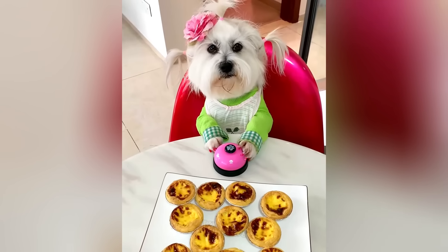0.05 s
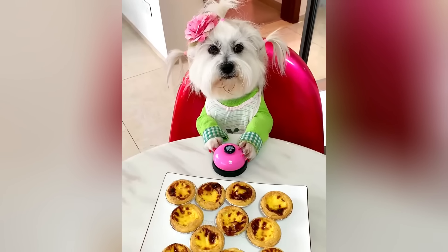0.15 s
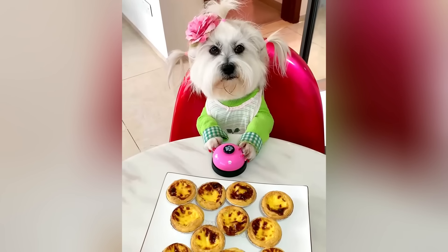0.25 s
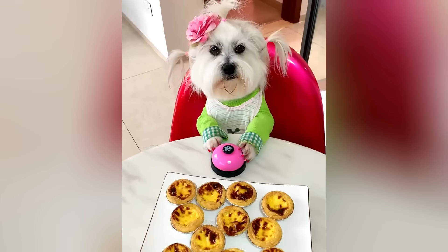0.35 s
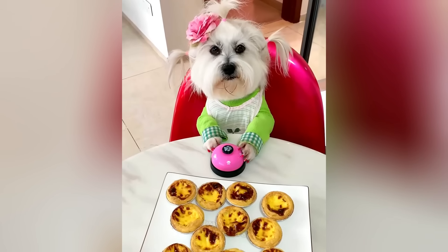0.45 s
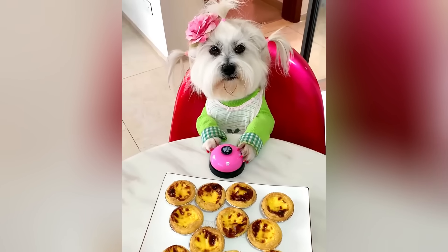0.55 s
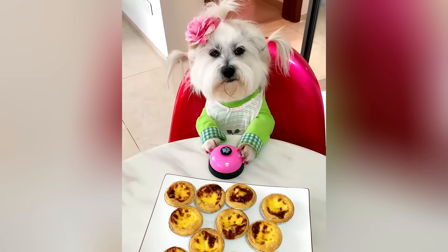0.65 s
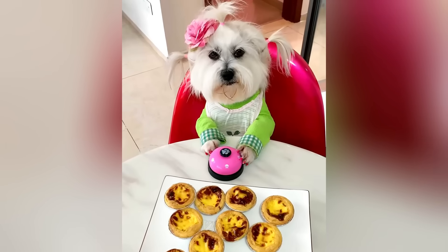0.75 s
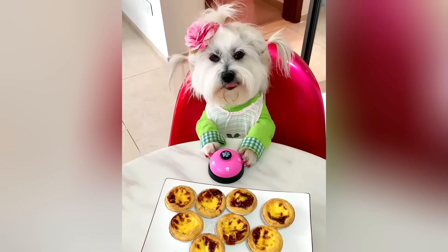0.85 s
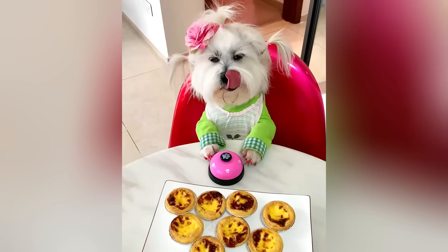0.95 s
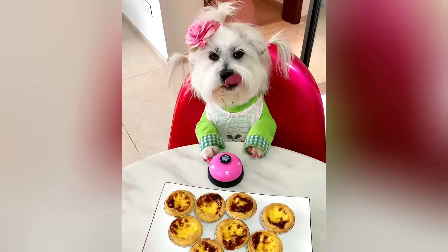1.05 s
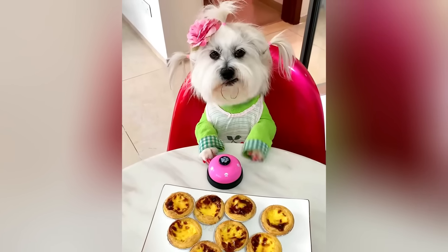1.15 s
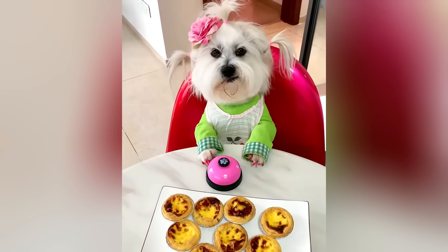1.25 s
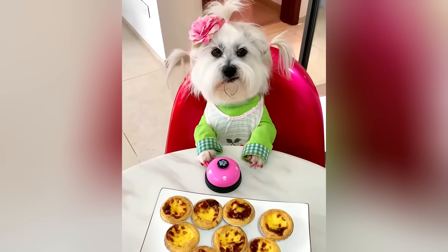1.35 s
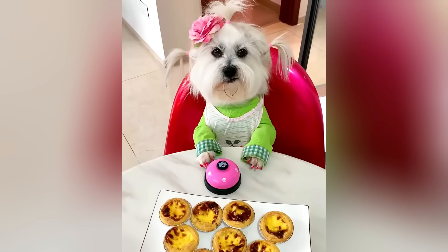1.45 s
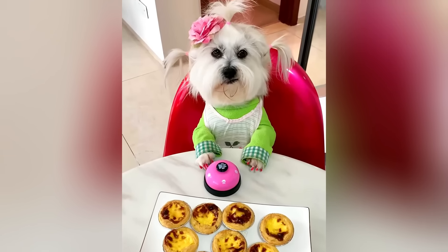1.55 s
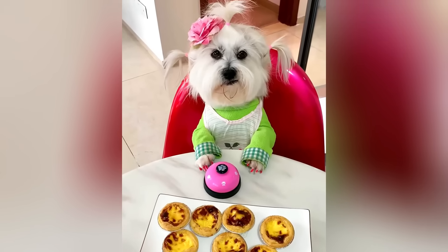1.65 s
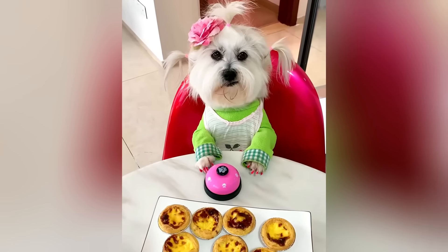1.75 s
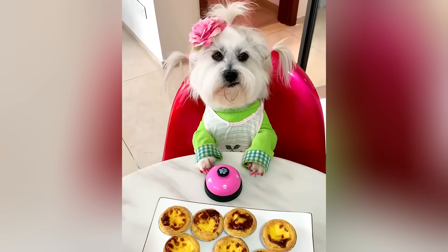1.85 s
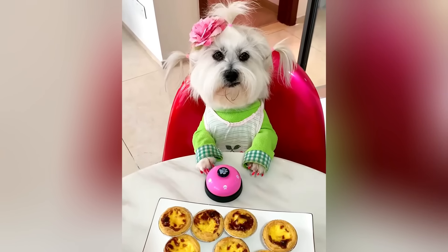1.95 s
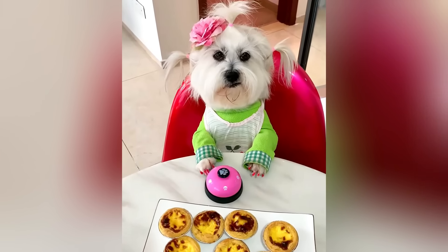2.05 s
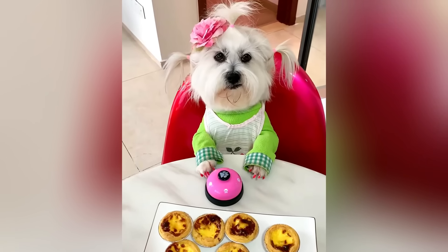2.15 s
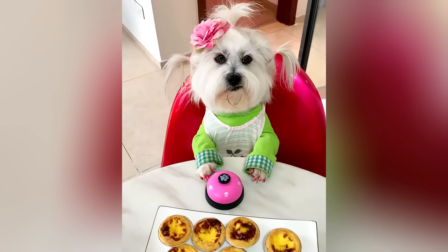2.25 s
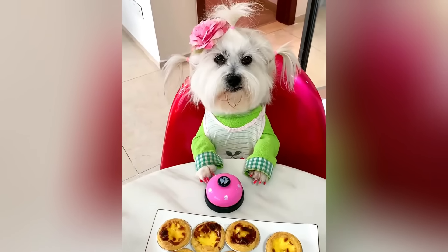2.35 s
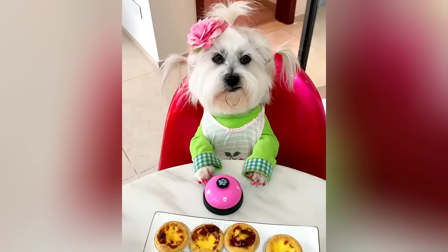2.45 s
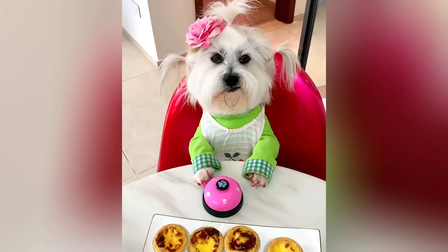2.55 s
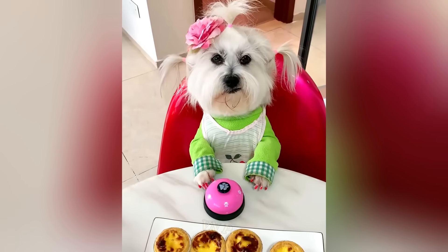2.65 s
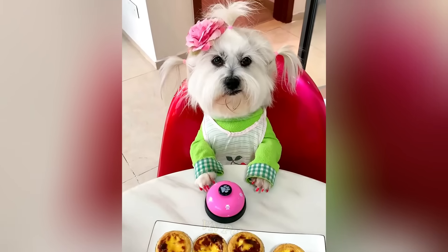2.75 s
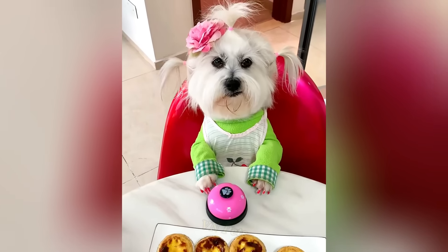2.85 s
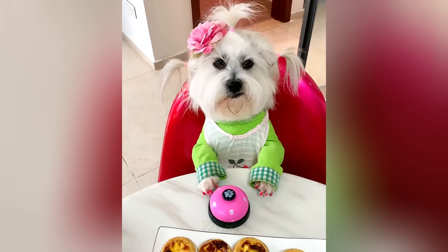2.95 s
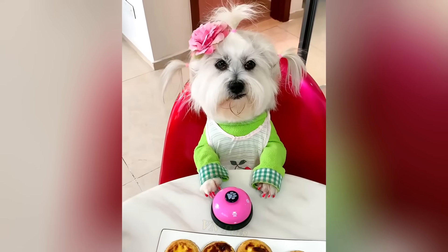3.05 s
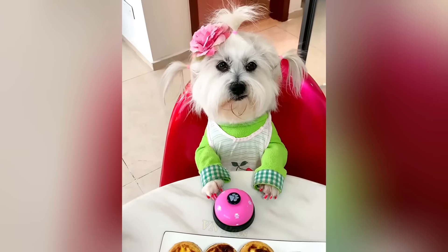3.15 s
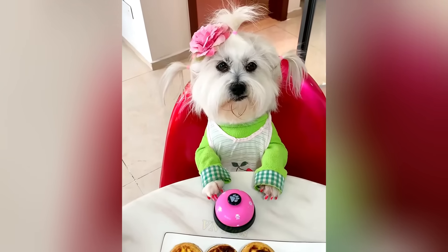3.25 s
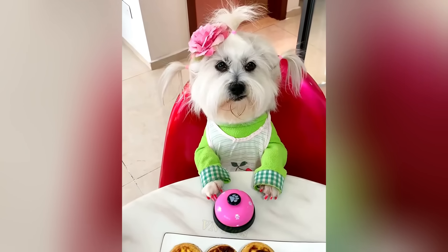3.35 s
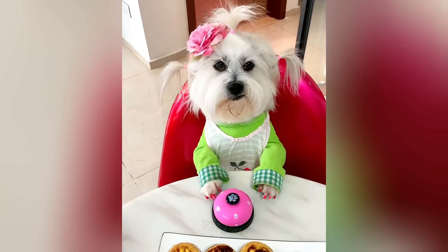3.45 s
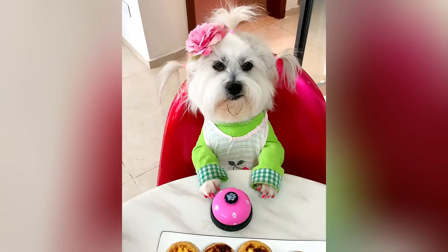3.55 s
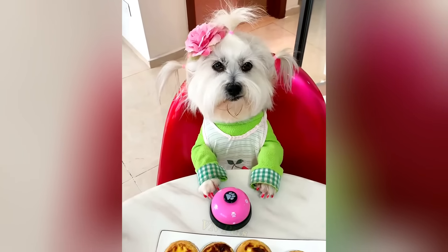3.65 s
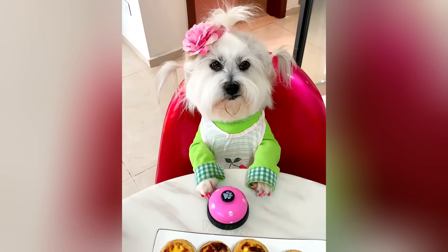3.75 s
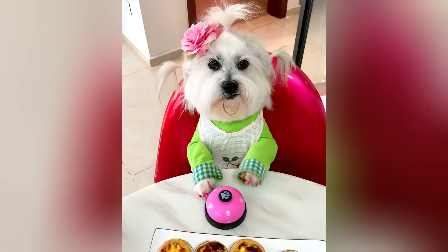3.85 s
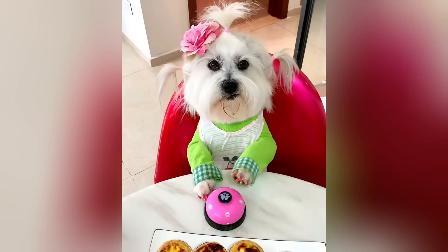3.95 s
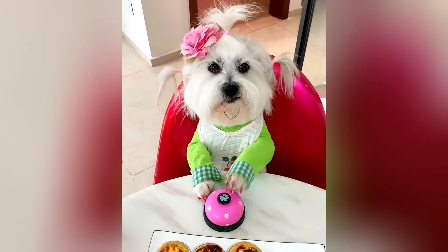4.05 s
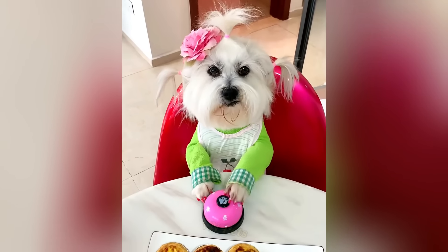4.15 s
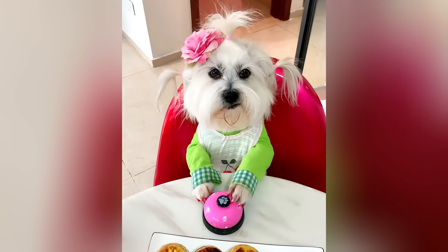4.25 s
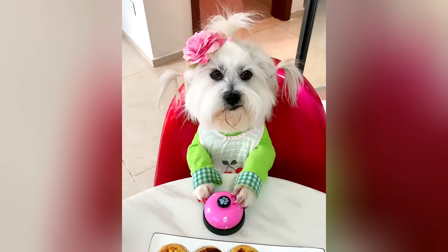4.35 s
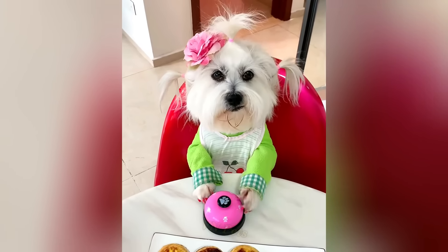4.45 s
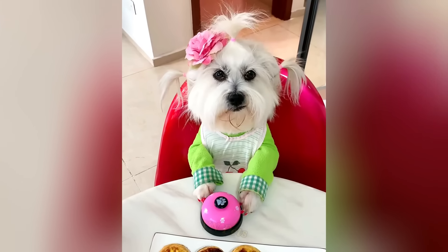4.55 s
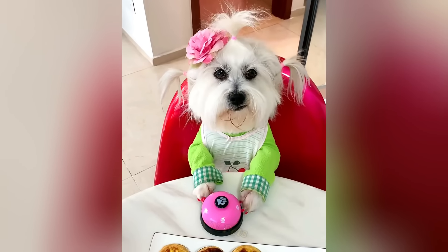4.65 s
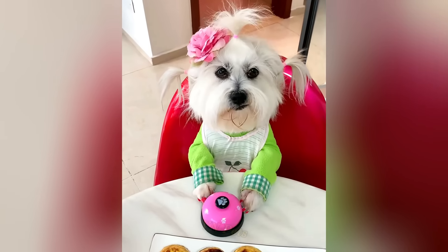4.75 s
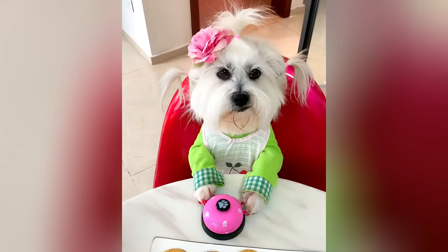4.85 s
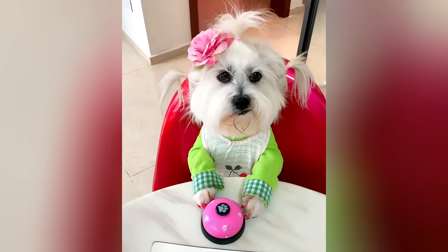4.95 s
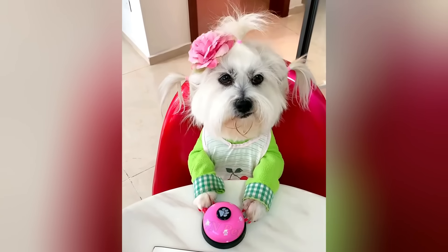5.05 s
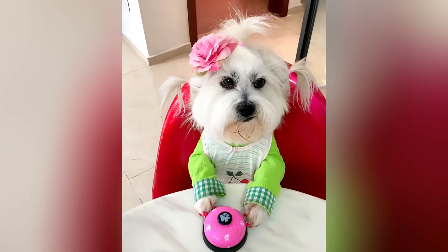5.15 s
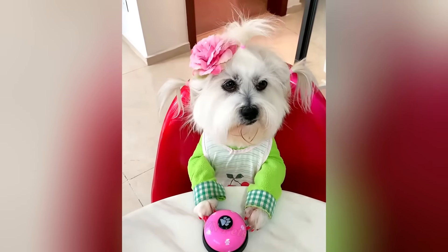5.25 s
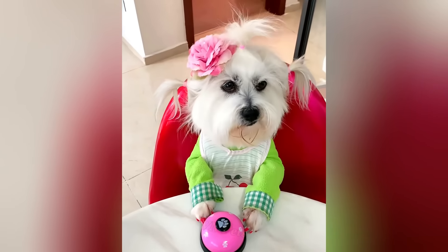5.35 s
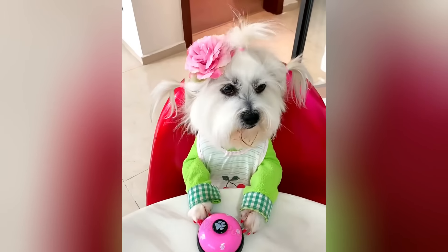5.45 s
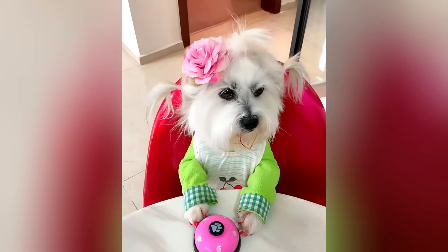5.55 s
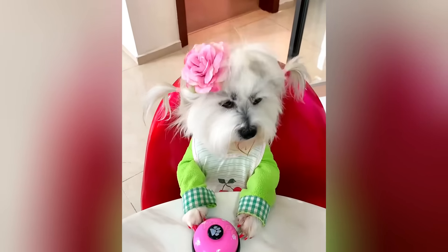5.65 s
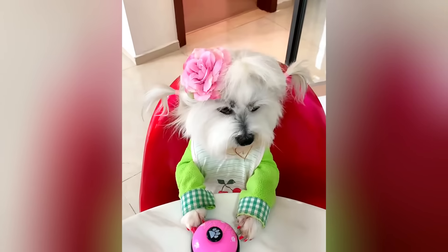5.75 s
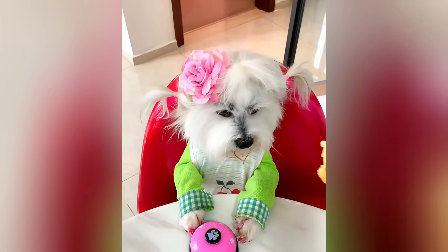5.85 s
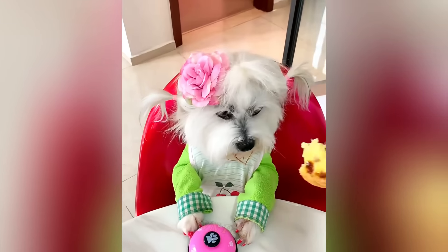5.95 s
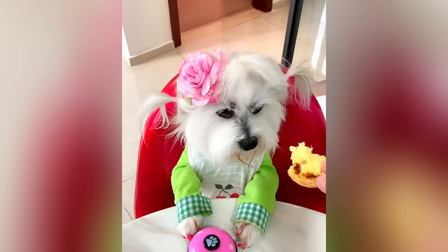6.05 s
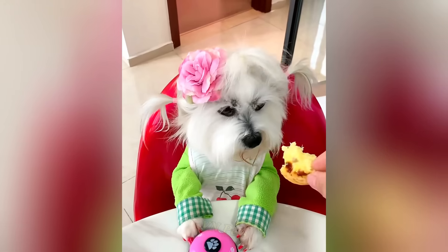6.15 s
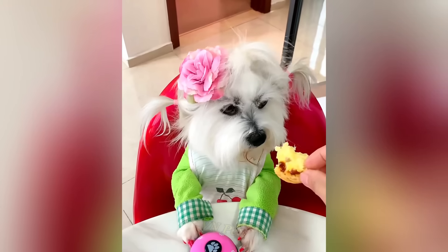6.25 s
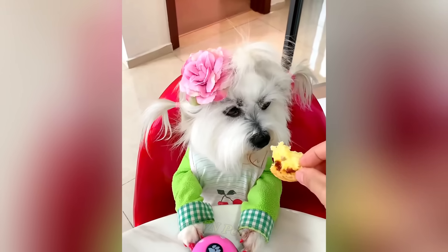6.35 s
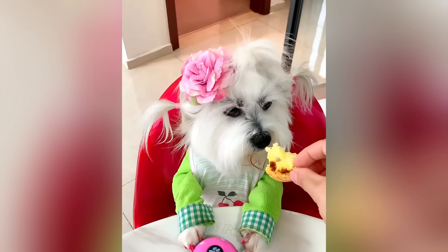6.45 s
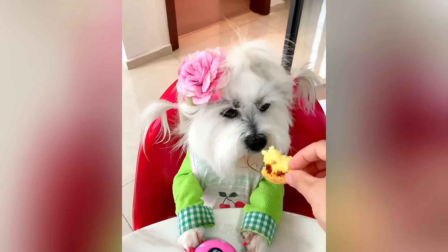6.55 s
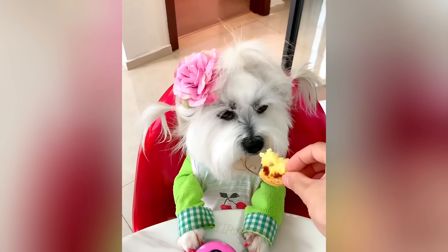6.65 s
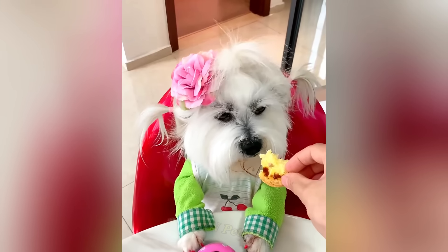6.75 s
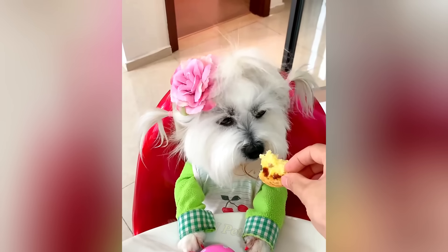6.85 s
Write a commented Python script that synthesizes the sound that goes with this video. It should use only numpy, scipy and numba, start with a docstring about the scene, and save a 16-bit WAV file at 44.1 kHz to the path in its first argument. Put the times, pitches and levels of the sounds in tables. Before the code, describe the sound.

Close stereo pickup in a quiet, hard-surfaced room. A desk bell's high metallic ring is fading from an earlier strike, with a faint click as its button returns. After a long decay, a paw presses again: short scrape, plastic clack, soft thump on stone and steel tick merge into a sharp ding. The ring pulses, dims and lingers to the end, with another faint release click.

```python
"""A push-button service bell on a stone table in a quiet room; the first ding is already ringing.
The button of that press clicks back, then a dog presses again: plunger rattle, thump, clapper on steel.
Modes are decaying sines, split pairs beat; the moving parts are filtered impulses and noise bursts.
The phone's limiter ducks on the blow and lets the ring swell back."""
import sys
import numpy as np
from scipy import signal
from scipy.fft import rfft, irfft, next_fast_len
from scipy.io import wavfile
from numba import njit

SR = 44100
rng = np.random.default_rng(int(sys.argv[2]) if len(sys.argv) > 2 else 0)


def dump_mix(stems):
    """Bounce the given channels to the path in sys.argv[1] as a 16-bit WAV at rate SR."""
    frames = np.atleast_2d(stems).T  # one column per channel
    limited = np.clip(frames, -1, 1)  # hard clip at full scale
    pcm = np.round(limited * 32767).astype(np.int16)
    wavfile.write(sys.argv[1], SR, pcm)


N = 305026

# clapper meets dome: (time [s], strength [dB])
STRIKES = [(-.392, -.2), (4.2776, .2)]
# single modes of the dome: (frequency [Hz], level [dB], t60 [s])
DOME_MODES = [(1260.8, -40.7, 8.4), (1305.2, -28.5, 5.9), (9115, -8, .61), (12920, -6.5, .31)]
# faint partials, mostly sums and differences of the modes: (frequency [Hz], level [dB], t60 [s])
FAINT_PARTIALS = [(1965, -81, 5), (2521.6, -59, 4.2), (2610.4, -67, 2.6), (4531.5, -65, 2.4),
                  (4575.6, -69, 2.1), (7157, -61, 1.3), (7695, -76, 3), (12088, -80, 5)]
# modes split by the dome's slight unevenness:
# (frequency [Hz], level [dB], t60 [s], beat [Hz], twin level re mode [dB], first lull [s])
SPLIT_MODES = [(3270.4, -24, 4.43, 3.365, -2, .029), (5890.8, -13.6, 1.92, 6.1, -20, .112)]
# plunger resonances: (frequency [Hz], width [Hz], level [dB])
PLUNGER_MODES = [(1630, 310, 3.5), (1972, 74, 10.5), (2330, 310, 1), (5180, 780, -19), (9440, 560, -21.5)]
# steel tick spectrum: (frequency [Hz], relative density [dB per Hz])
TICK_SPECTRUM = [(300, -28), (1500, -10.5), (4000, -4.5), (8000, -1.5), (12000, -4), (14000, 2.5),
                 (15300, 5.5), (16200, -21)]
# button release click spectrum: (frequency [Hz], relative density [dB per Hz])
RELEASE_SPECTRUM = [(300, -13), (900, -7), (2500, -7), (4800, -1), (7000, -7.5), (12000, -13), (14000, -32)]
# table response to a push: (frequency [Hz], gain [dB])
THUMP_RESPONSE = [(30, -3), (100, -1), (480, -2.5), (780, 1), (1050, -7.5), (2000, 6.5), (6000, -14)]
# room noise spectrum: (frequency [Hz], relative density [dB per Hz])
AIR_SPECTRUM = [(20, -0.5), (55, 1.5), (110, -3), (190, -8.5), (300, -15.5), (480, -15.5), (680, -17),
                (1000, -14), (2500, -18), (6000, -21), (12000, -23), (14000, -25.5)]
# left-right likeness of the room noise: (frequency [Hz], correlation [-1..1])
AIR_LIKENESS = [(30, .5), (100, 0.28), (300, 0.71), (8000, 0.61)]
# faint far appliance: (frequency [Hz], level [dB rms])
HUM_TONES = [(118, -99), (177, -93.5), (662, -98.5), (700, -100)]
# decay of the wall reflections: (frequency [Hz], t60 [s])
WALL_DECAY = [(200, 0.16), (2000, 0.057), (8000, 0.36), (15000, 0.099)]
# left microphone over right: (frequency [Hz], phase lead [rad], level [dB])
PORTS = [(1255, .27, 1), (1310, .14, .8), (3270, .08, .35), (5900, .02, .3), (9000, 0, 0)]

# leads run back from the strike, other times forward from it
SCRAPE_LEAD_S, SCRAPE_DB, SCRAPE_T60_S, SCRAPE_RISE_S = .019, -28.5, .11, .0087
RATTLE_LEAD_S, RATTLE_GAP_S = .0148, .00405
RATTLE_DB, RATTLE_LOSS_DB = 6.5, 4.5  # first knock, loss per knock
LEVER_LEAD_S, LEVER_DB = .0032, 13.5  # plunger slaps the clapper's lever
SETTLE_S, SETTLE_DB = .057, -13.5  # button at the bottom
PIN_DB, PIN_T60_S = -29.5, .008  # steel tick within each plastic knock
CONTACT_RISE_S = .0003
PAW_DB, THUMP_DB = -17.5, -1.5  # paw lands; blow
BLOW_DB, BLOW_T60_S = -6.5, .0099
REBOUND_S, REBOUND_LOSS_DB = .0112, 7  # clapper falls back on its stop
HOLD_S, RELEASE_DB, RELEASE_T60_S = .6255, -48.5, .012  # button let go
SLOW_BELOW_HZ = 2500
TOP_HZ = 16900


def amp(db):
    """Decibels to gain."""
    return 10 ** (np.asarray(db) / 20)


def unit(x):
    """Scale to rms 1."""
    return x / np.sqrt(np.mean(x ** 2) + 1e-20)


def along(points, hz):
    """Interpolate (frequency [Hz], value) points on a log frequency axis."""
    point_hz, value = np.transpose(points)
    return np.interp(np.log(hz + 1), np.log(point_hz + 1), value)


def filtered(x, response):
    """Apply a complex frequency response, zero-padded."""
    size = next_fast_len(N + SR // 2)
    spectrum = rfft(x, size) * response(np.fft.rfftfreq(size, 1 / SR))
    return irfft(spectrum, size)[..., :N]


def noise(spectrum):
    """Coloured noise of rms 1."""
    white = rng.standard_normal(N)
    return unit(filtered(white, lambda hz: amp(along(spectrum, hz))))


def since(start_s):
    """Seconds since start, zero before it."""
    return np.maximum(np.arange(N) / SR - start_s, 0)


def sine(hz, t):
    """Sine of zero phase at t = 0."""
    return np.sin(2 * np.pi * hz * t)


def fade(t, t60_s, rise_s):
    """Exponential rise and exponential decay."""
    return (1 - np.exp(-t / rise_s)) * np.exp(-np.log(1000) * t / t60_s)


def knock(t, t60_s, rise_s=CONTACT_RISE_S):
    """Envelope of one contact, silent before t = 0."""
    return fade(np.maximum(t, 0), t60_s, rise_s)


def push(t):
    """One-sample impulse at t = 0."""
    return np.abs(t) < .5 / SR


def dome(start_s, attack_s=.001):
    """One blow excites all the steel modes; the lowest swell in last and split modes beat."""
    t = since(start_s)

    def envelope(hz, t60_s):
        return fade(t, t60_s, attack_s * (1 + (SLOW_BELOW_HZ / hz) ** 4))

    ring = np.zeros(N)
    for hz, db, t60_s in DOME_MODES + FAINT_PARTIALS:
        ring += amp(db) * envelope(hz, t60_s) * sine(hz, t)
    for hz, db, t60_s, beat_hz, twin_db, lull_s in SPLIT_MODES:
        # the twin cancels most at the lull
        twin = amp(twin_db) * np.sin(2 * np.pi * (hz * t - beat_hz * (t - lull_s)))
        ring += amp(db) * envelope(hz, t60_s) * (sine(hz, t) - twin)
    return ring


def air(level_db=-77.5):
    """Room rumble and hiss as mid/side noise of set correlation, plus steady hum tones."""
    def mid_side_gain(hz):
        angle = np.arccos(np.clip(along(AIR_LIKENESS, hz), -1, 1)) / 2
        return np.array([np.cos(angle), np.sin(angle)])

    sources = np.array([noise(AIR_SPECTRUM), noise(AIR_SPECTRUM)])
    mid, side = filtered(sources, mid_side_gain)
    hum = sum(amp(db) * np.sqrt(2) * sine(hz, since(0)) for hz, db in HUM_TONES)
    return amp(level_db) * np.array([mid + side, mid - side]) + hum


def button_release(t, click):
    """The button clicks back when let go: a short noise burst."""
    return amp(RELEASE_DB) * knock(t - HOLD_S, RELEASE_T60_S) * click


def plastic(hz, low_hz=1200):
    """Plunger resonances of alternating sign; so small a part radiates little bass."""
    modes = 0
    for k, (centre_hz, width_hz, db) in enumerate(PLUNGER_MODES):
        damping = 1j * hz * width_hz
        modes = modes + (-1) ** k * amp(db) * damping / (centre_hz ** 2 - hz ** 2 + damping)
    return modes * (hz ** 2 / (hz ** 2 + low_hz ** 2)) ** 2


def plunger(t, tick, count=2):
    """The steel pin scrapes; the plunger knocks in its guide, slaps the lever and settles."""
    contacts = [(k * RATTLE_GAP_S - RATTLE_LEAD_S, RATTLE_DB - k * RATTLE_LOSS_DB) for k in range(count)]
    contacts += [(-LEVER_LEAD_S, LEVER_DB), (SETTLE_S, SETTLE_DB)]
    pushes = sum(amp(db) * push(t - at_s) for at_s, db in contacts)
    clack = filtered(pushes, plastic)
    pin = sum(amp(db + PIN_DB) * knock(t - at_s, PIN_T60_S) for at_s, db in contacts)
    scrape = amp(SCRAPE_DB) * knock(t + SCRAPE_LEAD_S, SCRAPE_T60_S, SCRAPE_RISE_S)
    return clack + (pin + scrape) * tick


def table_thump(t):
    """The stone table takes the paw's weight, then the blow, as two filtered impulses."""
    load = amp(PAW_DB) * push(t + RATTLE_LEAD_S) + amp(THUMP_DB) * push(t)
    return filtered(load, lambda hz: amp(along(THUMP_RESPONSE, hz)))


def clapper(t, tick):
    """The clapper ticks on the dome and rebounds once onto its stop."""
    blow = knock(t, BLOW_T60_S)
    rebound = amp(-REBOUND_LOSS_DB) * knock(t - REBOUND_S, BLOW_T60_S)
    return amp(BLOW_DB) * (blow + rebound) * tick


def works():
    """Each press moves plunger, table and clapper, then the button returns."""
    tick, click = noise(TICK_SPECTRUM), noise(RELEASE_SPECTRUM)
    out = np.zeros(N)
    for start_s, db in STRIKES:
        t = np.arange(N) / SR - start_s
        press = plunger(t, tick) + clapper(t, tick) + table_thump(t)
        out += amp(db) * (press + button_release(t, click))
    return out


def room(x):
    """Walls answer with a short diffuse noise tail, different in each channel."""
    white = rng.standard_normal((2, SR // 2))
    hz, t, cells = signal.stft(white, SR, nperseg=256)
    decay = np.exp(-np.log(1000) * t / along(WALL_DECAY, hz)[:, None])
    tail = signal.istft(cells * decay, SR, nperseg=256)[1]
    tail = tail / np.linalg.norm(tail[0])
    return signal.fftconvolve(x[None], tail, axes=1)[:, :N]


def ports(x):
    """Low modes reach the left microphone slightly sooner and louder."""
    table = np.array(PORTS)

    def response(hz):
        lead_rad = along(table[:, [0, 1]], hz)
        log_gain = np.log(amp(along(table[:, [0, 2]], hz)))
        return np.exp(np.outer([.5, -.5], 1j * lead_rad + log_gain))

    return filtered(x, response)


def scene(works_wet_db=-19, ring_wet_db=-33):
    """The bell stands close, almost straight ahead, with faint reflections and room air."""
    ring = sum(amp(db) * dome(start_s) for start_s, db in STRIKES)
    knocks = works()
    wet = room(amp(works_wet_db) * knocks + amp(ring_wet_db) * ring)
    return ports(ring + knocks) + wet + air()


@njit
def held(excess, keep):
    """Follow each peak at once, then let go exponentially."""
    out = excess.copy()
    for i in range(1, len(out)):
        out[i] = max(out[i], out[i - 1] * keep)
    return out


def limiter(x, ceiling_db=-13.0, attack_s=.0026, release_s=.14):
    """Peaks over the ceiling pull both channels down; the smoothed cut lets the onset through."""
    level_db = 20 * np.log10(np.abs(x).max(axis=0) + 1e-9)
    excess_db = np.maximum(level_db - ceiling_db, 0)
    peak_db = held(excess_db, np.exp(-1 / (release_s * SR)))
    keep = np.exp(-1 / (attack_s * SR))
    cut_db = signal.lfilter([1 - keep], [1, -keep], peak_db)
    return x * amp(-cut_db)


def record(dry):
    """The phone limits the level, then low-passes: 80 dB down from TOP_HZ."""
    lowpass = signal.cheby2(16, 80, TOP_HZ, fs=SR, output="sos")
    return signal.sosfilt(lowpass, limiter(dry))


dry = scene()
out = record(dry)
dump_mix(out)
```